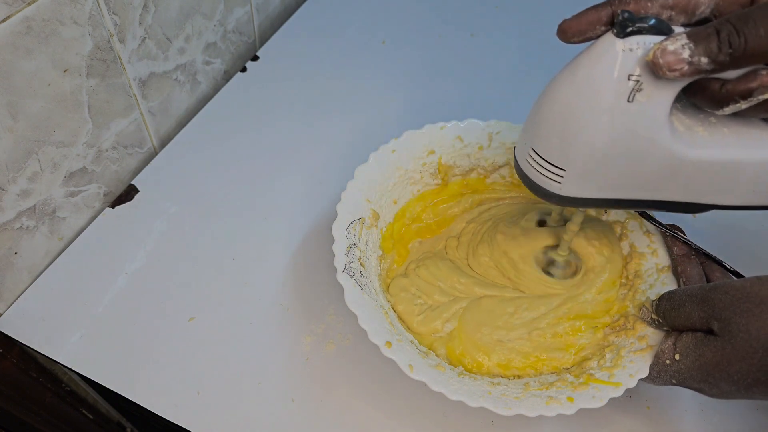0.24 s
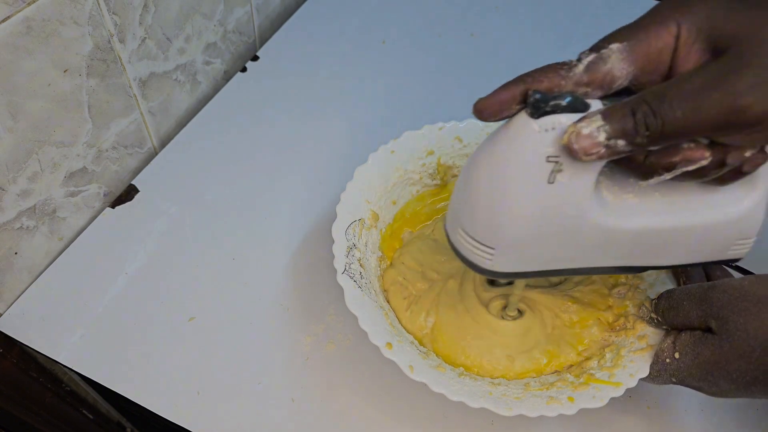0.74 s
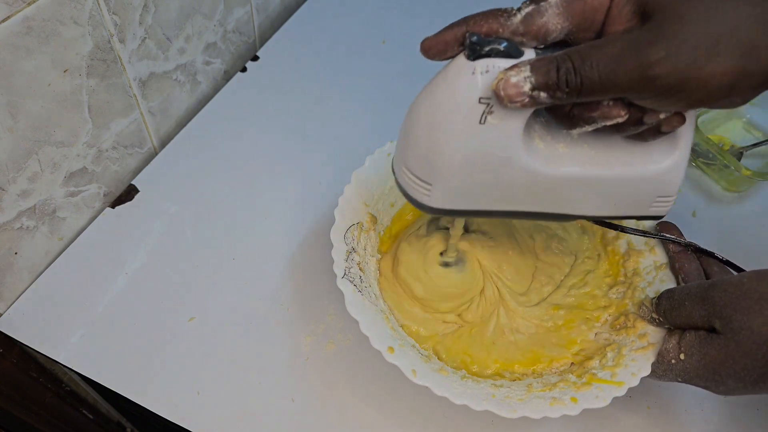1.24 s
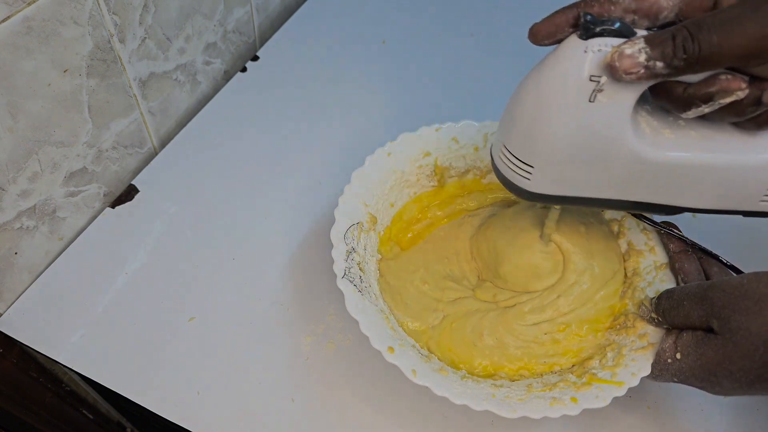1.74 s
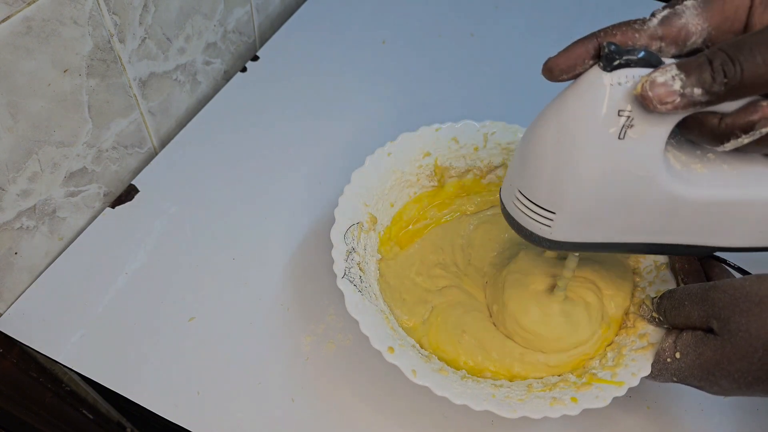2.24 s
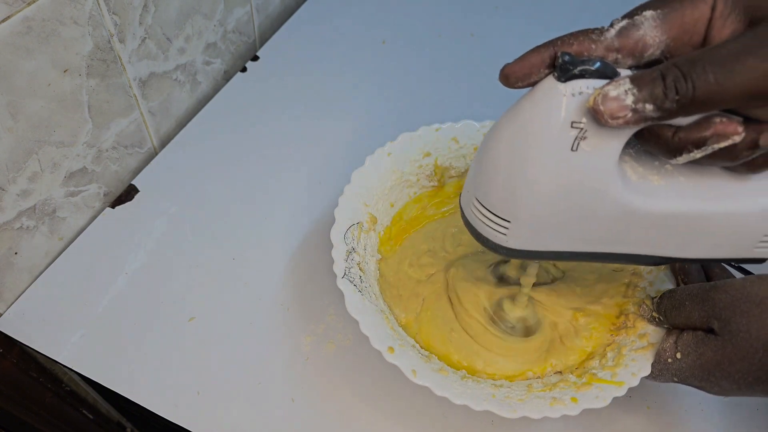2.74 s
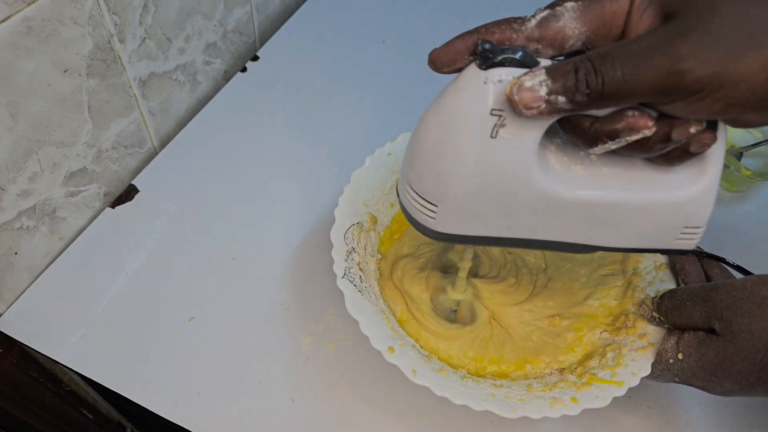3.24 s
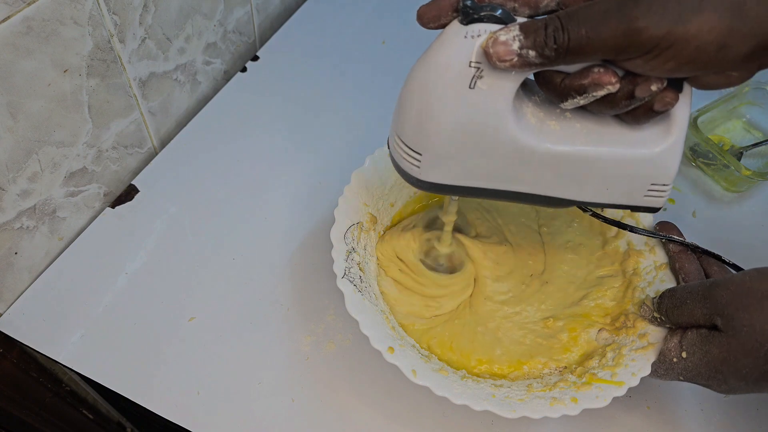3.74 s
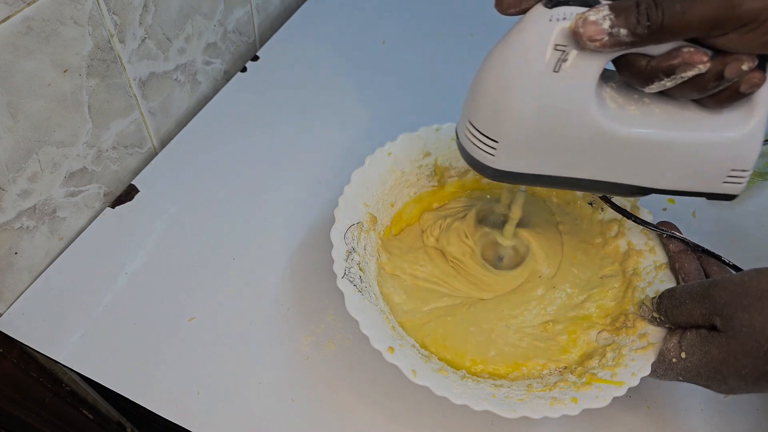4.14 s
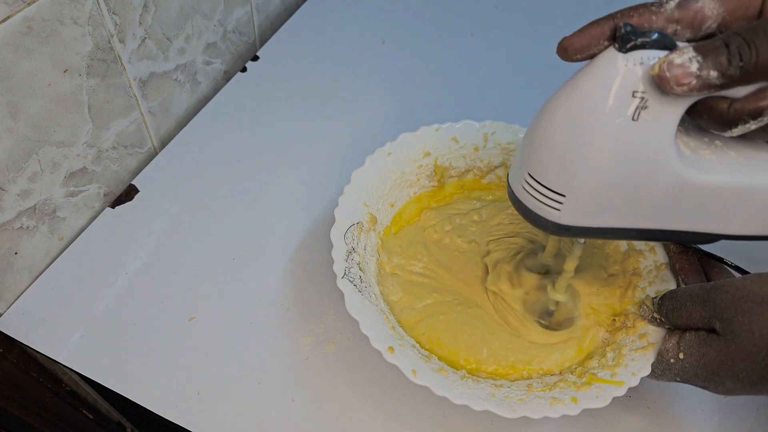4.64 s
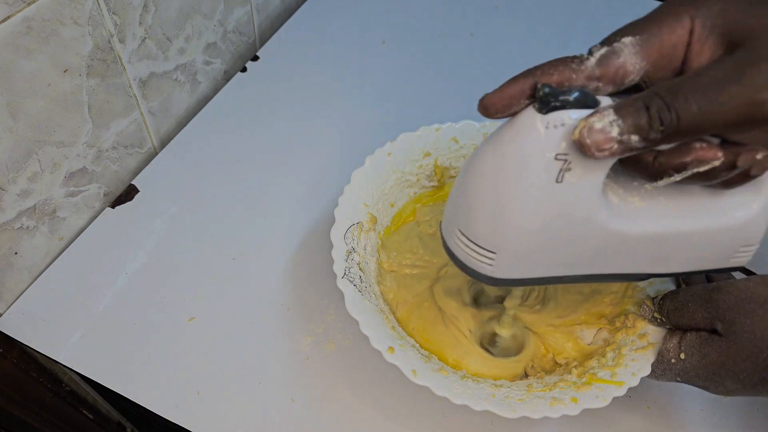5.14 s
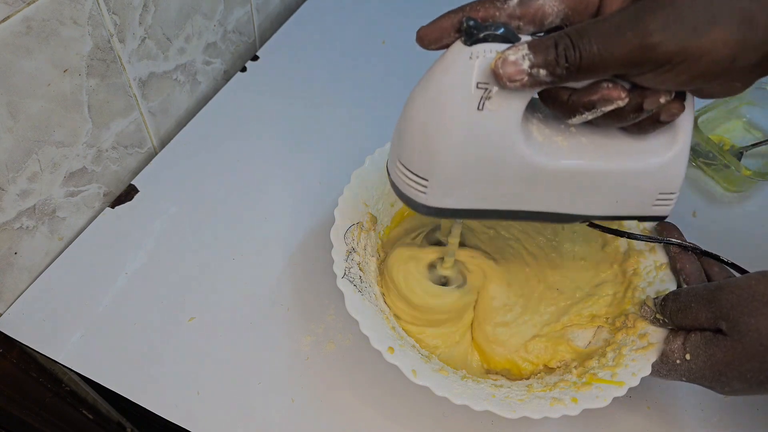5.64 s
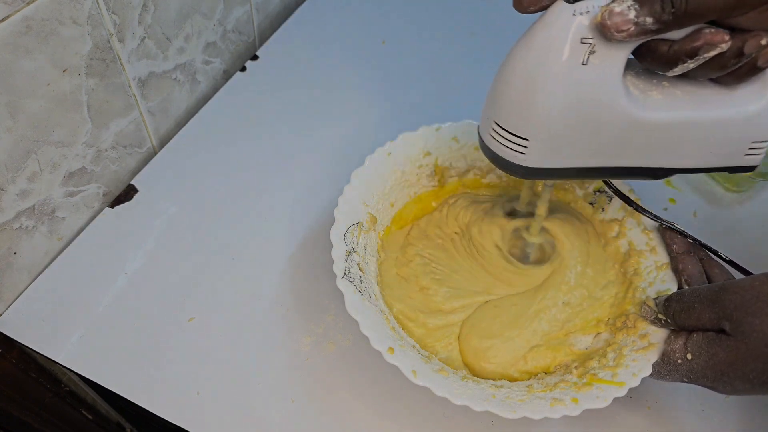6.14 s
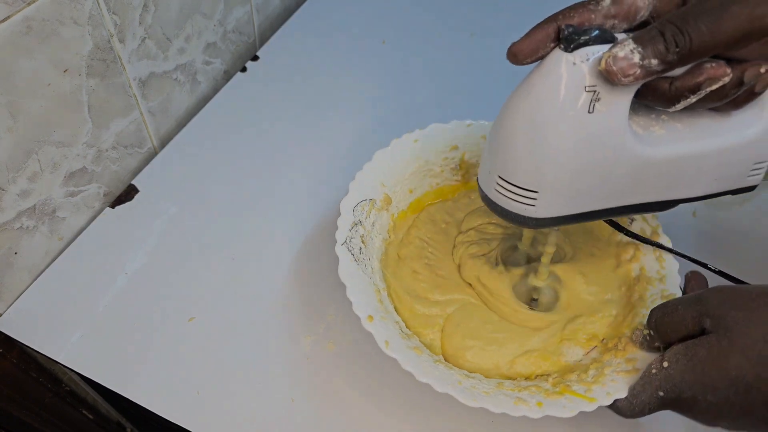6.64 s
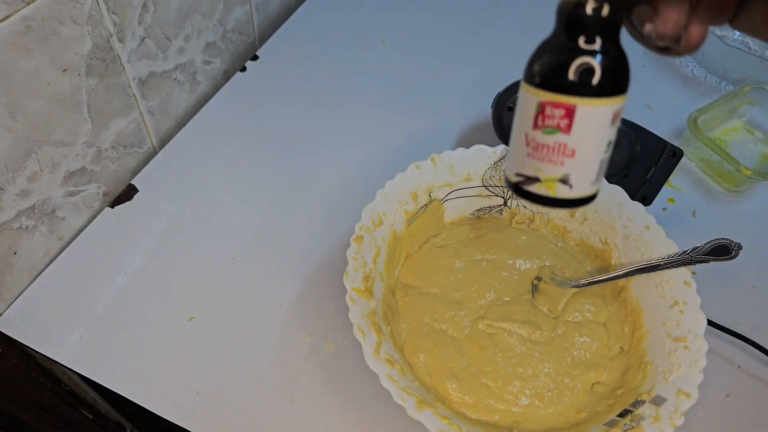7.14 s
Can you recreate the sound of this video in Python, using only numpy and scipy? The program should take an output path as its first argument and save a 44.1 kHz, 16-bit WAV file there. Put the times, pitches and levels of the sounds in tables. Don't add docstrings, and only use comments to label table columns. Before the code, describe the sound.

From the start an electric hand mixer is already running, close to a stereo microphone on a kitchen counter: a buzzy tonal whine near 270 Hz with singing overtones, wrapped in wide fan roar and brush hiss. A dull knock comes at about 0.65 s, then a rapid fading rattle of beaters on the batter-damped bowl from 0.8 to 0.95 s, with a growling scrape and last knocks until 1.15 s. The motor sags audibly to about 240 Hz around 1.75 s, recovers by 2.5 s and climbs to its highest whine near 3.3 s. It then holds slightly lower, wavering, overtones swelling and fading. From 5 to 5.6 s the tone throbs quickly; afterwards it runs on with a little more low electrical buzz. At 6.9 s it cuts off at once, leaving very quiet low room rumble and a faint appliance hum until about 7.4 s.

```python
import sys
import numpy as np
from scipy import signal
from scipy.io import wavfile
from scipy.ndimage import uniform_filter1d

SR = 44100
rng = np.random.default_rng(int(sys.argv[2]) if len(sys.argv) > 2 else 0)


def digitize_waveform(pressure):
    field = np.atleast_2d(pressure).T
    bounded = np.clip(field, -1, 1)
    quanta = np.round(bounded * 32767).astype(np.int16)
    wavfile.write(sys.argv[1], SR, quanta)


def invert_db(x):
    u = np.asarray(x, float) / 20
    return 10 ** u


N = 326207

# time in seconds, vents facing the microphone in dB,
# pressure on the bowl in dB.
HANDLING = [(0, -1, -4.5), (.48, 0.5, -2), (.84, 2.5, 6.5), (.92, -1.5, 6), (1.32, 1, -2),
            (1.71, -2.5, -4.5), (1.98, -2, -2), (2.8, 3.5, -0.5), (2.97, 4, 2.5), (3.59, 2, 2.5),
            (4.07, 1.5, -1.5), (4.95, 3.5, 1), (5.37, 0.5, 2.5), (6.02, 3, -2.5), (6.7, 1.5, 0),
            (6.89, 7.5, -1)]


def speed(t):
    # time in seconds, shaft speed in Hz.
    shaft = [(0.0, 273.8), (0.32, 272.2), (0.67, 283.3), (1.15, 287), (1.61, 244.4), (1.76, 238.6),
             (2.06, 264.8), (2.5, 288.7), (3.01, 323), (3.29, 328.3), (4.02, 309.4), (4.34, 313.7),
             (5.02, 316.4), (5.62, 298.9), (6.04, 307), (6.31, 300.6), (6.65, 311.5), (6.89, 305.7)]
    inertia_s = 0.12
    return uniform_filter1d(curves(shaft, t)[0], round(inertia_s * len(t) / t[-1]), mode="nearest")


def shaft_turns():
    t = np.arange(N) / SR
    flutter = 1 + 0.00072 * drift(25, t)
    return np.cumsum(speed(t) * flutter) / SR


def order_level(order, base_db, t):
    # resonance in Hz, half width in Hz, lift in dB.
    panels = [(635.6, 64.7, 48), (789, 41, 6.5), (1068, 56, 6.5), (1344, 91, 18), (1521, 85, 13.5),
              (1805, 58, 14.5), (2616, 77, 8.5), (3698, 47, 0.5), (7230, 152, 7.6), (7600, 456, 13.5),
              (10370, 67, -1), (11700, 120, 11.5), (14400, 600, 7)]
    # middle in seconds, half length in seconds,
    # order, lift in dB.
    grip = [(0, 0.18, 1, -12), (0.13, 0.049, 5, -6.5), (.14, 0.1, 3, 6), (.75, 0.23, 5, -7.5),
            (0.996, 0.022, 3, 13), (1.323, 0.099, 3, 6), (1.43, 0.13, 1, -8), (1.51, .5, 4, -9),
            (1.3, .1, 5, -5.5), (1.755, 0.23, 5, 21.5), (1.902, 0.034, 5, -9.5), (1.977, 0.15, 1, -10),
            (2.05, 0.097, 5, -1), (2.556, .12, 1, 5), (2.72, 0.082, 4, 9), (2.739, .16, 5, -17),
            (3.06, 0.11, 1, 3.5), (3.13, 0.036, 2, -2.5), (3.368, 0.046, 2, -9.5), (4.05, .1, 2, -2),
            (4.836, 0.28, 3, 8), (5.1, 0.16, 4, -4), (2.354, 0.13, 5, 3.5), (6.584, .08, 2, -3.5),
            (5.29, .17, 5, -14.5), (5.317, 0.22, 3, -18.5), (6.02, 0.49, 4, 6.5), (6.72, .08, 4, -4.5),
            (6.87, .17, 3, -14.5), (6.888, 0.17, 1, -4)]
    # middle in seconds,
    # half length in seconds, order, lift in dB.
    flares = [(0.456, .12, 8, -17), (1.358, .18, 8, 16), (1.62, 0.31, 7, 18), (1.681, 0.14, 9, 7.5),
              (1.68, .28, 14, 14), (1.723, .14, 12, 10.5), (2.394, 0.83, 8, -12.5), (2.465, 0.066, 9, 2.5),
              (3.322, .2, 7, -16), (2.901, .3, 36, -2.5), (1.4, 0.21, 24, 7.5), (3.371, 0.17, 22, 8),
              (3.678, .29, 23, 10), (3.71, .18, 9, 3), (3.769, .15, 46, 14), (3.9, .49, 7, 19),
              (3.941, 0.4, 47, 7), (4.08, .43, 12, 7.5), (4.313, 0.22, 6, 16.5), (4.427, 0.31, 24, -8.5),
              (4.46, 0.29, 9, 7), (4.539, .16, 47, 12), (4.55, 0.32, 36, 5), (5.037, .09, 24, 9.5),
              (5.033, .1, 6, 23), (5.5, 0.35, 6, -25.5), (5.72, 0.44, 13, 10.5), (6.179, 0.66, 14, 10.5),
              (6.85, 0.1, 9, -7.5), (6.868, .08, 7, 16)]
    db = base_db + sum(lift * bump(order * speed(t), f, w) for f, w, lift in panels)
    for middle, half, moved_order, lift in grip + flares:
        if round(moved_order) == order:
            db = db + lift * bump(t, middle, half)
    facing = curves(HANDLING, t)[0]
    fading_db = 1.4 * (order > 5) * drift(7, t)
    return db + 0.05 * facing + fading_db


def gear_levels(t):
    # shaft turns per cycle, level in dB.
    gears = [(5, -54), (4, -59)]
    (slow, slow_db), (fast, fast_db) = gears
    press_db = 0.46 * curves(HANDLING, t)[1]
    load_db = -22.5 * np.log2(speed(t) / 300)
    scrape_db = 12 * span(t, 0.77, 1)
    slow_level = slow_db + press_db + load_db + scrape_db - 6 * bump(t, 5.0, 0.4) + 4.2 * drift(12, t)
    top_speed_db = 6 * bump(speed(t), 338.4, 7.7)
    fast_level = fast_db + press_db + top_speed_db + 2 * drift(6.6, t)
    return {1 / round(slow): slow_level, 1 / round(fast): fast_level}


def orders(turns):
    # multiple of the shaft speed, level in dB.
    order_db = [(1, -40.8), (2, -75.5), (3, -45.5), (4, -48), (5, -52), (6, -58), (7, -63.5), (8, -50.5),
                (9, -44.5), (12, -52.5), (13, -60.5), (14, -62.5), (22, -64), (23, -67.5), (24, -57.5),
                (25, -66), (35, -66), (36, -58.9), (37, -57.5), (46, -68), (47, -68), (48, -62)]
    # frequency in Hz, side minus mid in dB.
    apart = [(60, -20), (120, -17), (300, -5), (630, -13), (1000, -2), (2000, 0)]
    beater_ratio = 17
    t, coarse = np.arange(N) / SR, np.linspace(0, N / SR, 2000)
    hz = speed(t)
    buzz_db = -61 + 9 * span(t, 5.45, N / SR, 0.2)
    out = np.zeros((2, N)) + invert_db(buzz_db) * np.sin(2 * np.pi * 120 * t)
    drag = 0.58 * span(t, 5.05, 5.6, 0.033)
    throb = 1 - drag + 2 * drag * np.cos(2 * np.pi * turns / beater_ratio)
    levels = {round(k): order_level(round(k), db, coarse) for k, db in order_db}
    levels = levels | gear_levels(coarse)
    for k, level_db in levels.items():
        db = np.interp(t, coarse, level_db)
        angle = 2 * np.pi * (k * turns + rng.random())
        mid_db = db + (1.32 + 0.04 * k) * drift(30, t)
        mid = invert_db(mid_db) * np.cos(angle) * (throb if k == 1 else 1)
        side_db = uniform_filter1d(db, 15000) + read(apart, k * hz) + 1.65 * drift(3, t)
        side_angle = angle + 2 * np.pi * rng.random() + 0.68 * drift(1.49, t)
        side = invert_db(side_db) * np.cos(side_angle)
        out += np.sqrt(2) * np.array([mid + side, mid - side])
    return out


def noise_levels(hz, t):
    # frequency in Hz, level in dB per Hz.
    air = [(53, -46), (90, -20), (254, -12.5), (308, -14.5), (351, -8), (475, -15.5), (616, -4), (1060, -8),
           (1930, -5.5), (2300, -11), (2510, -9.5), (14400, -23.5), (15700, -28)]
    # frequency in Hz, width in Hz, lift in dB.
    housing = [(84, 14, 12.5), (216, 21, 5.5), (651, 140, 9.5), (1875, 37, 10), (2057, 250, 7.5),
               (3220, 210, -2.5), (2600, 510, 4), (3666, 96, 9.5), (7520, 800, 2.5), (14840, 1200, 6)]
    colour_db = read(air, hz) + sum(db / (1 + (2 * (hz - f) / w) ** 2) for f, w, db in housing)
    facing, press = curves(HANDLING, t)
    hiss_db = 0.12 * facing + 10 * np.log2(speed(t) / speed(t).mean())
    swings = [1.2 * press, press, facing, hiss_db]
    centres = np.log([150, 700, 2000, 5000])
    swing_db = 0
    for k, swing in enumerate(swings):
        share = np.interp(np.log(hz + 1), centres, np.eye(4)[k])
        swing_db = swing_db + share[:, None] * swing
    vent_hz = 1936 - 38 * facing
    vent_db = bump(hz[:, None], vent_hz, 63)
    return colour_db[:, None] + swing_db + vent_db


def roar(turns):
    # frequency in Hz, left-right likeness from 0 to 1.
    likeness = [(60, 0.93), (170, 1), (300, 0.67), (680, 0.85), (1000, 0.24), (1600, 0.034), (2080, 0.16),
                (3000, 0.022)]
    hz, t = np.fft.rfftfreq(1024, 1 / SR), np.arange(N // 256 + 5) * 256 / SR
    field_db = noise_levels(hz, t)
    noise_db = field_db + 0.97 * patches(field_db.shape, 8, 16)
    noise = evened(hiss(noise_db, read(likeness, hz), size=1024))
    beat = 1 + 0.08 * np.cos(2 * np.pi * turns) + 0.14 * np.cos(4 * np.pi * turns)
    place, k = np.linspace(0, 1, 4097), np.arange(6, 51)[:, None]
    pattern = [np.cos(2 * np.pi * (k * place + rng.random(k.shape))).sum(0) for _ in range(2)]
    repeated = [np.interp(turns % 1, place, p) for p in pattern]
    z = signal.stft(repeated, nperseg=1024, noverlap=768)[2]
    bright_db = 1.6 * np.log2(hz[:, None] / 2000 + 0.5)
    fading_db = 5 * patches(z.shape, 6, 35)
    z = z * invert_db(field_db[:, :z.shape[2]] + bright_db + fading_db)
    brushes = evened(signal.istft(z, nperseg=1024, noverlap=768)[1][:, :N])
    return invert_db(-28) * noise * beat + invert_db(-37.5) * brushes


def strikes():
    # time in seconds, peak in dB, counter thump in relative dB.
    stray = [
        (.647, -23, -8),
        (.997, -28, -13),
        (1.079, -39, -25),
        (1.136, -21, -19),
    ]
    start_s, every_s, thump_db = 0.801, 0.0172, -14.5
    step = np.arange(9)
    db = -11 - 5.5 * (step / step[-1]) ** 3 - 2 * (step % 2)
    return stray + [(start_s + every_s * n, d, thump_db) for n, d in zip(step, db)]


def knocks():
    # frequency in Hz, level in dB, 60 dB decay time in seconds.
    bowl = [(110, 19, 0.044), (228, 4.5, 0.033), (380, -6, 0.15), (489, 9, 0.036), (586.5, -2, 0.012),
            (674, -6.5, .04), (1460, -42, 0.0095)]
    t, out = np.arange(6000) / SR, np.zeros(N + 6000)
    hz, mode_db, t60 = np.transpose(bowl)[:, :, None]
    low = hz < 150
    onset = 1 - np.exp(-t / 0.00041)
    for s, db, thump_db in strikes():
        a, b = rng.random((2, len(bowl), 1))
        level_db = mode_db - 60 * t / t60 + np.where(low, thump_db, 6 * a)
        mode_hz = hz * np.where(low, 1, 0.996 + 0.039 * b)
        ring = invert_db(level_db) * np.sin(2 * np.pi * mode_hz * t)
        out[round(s * SR):][:6000] += invert_db(db - 18) * ring.sum(0) * onset
    return out[:N] * np.array([[0.5], [-0.5]])


def kitchen():
    # frequency in Hz, level in dB per Hz.
    room = [(12, -60), (20, -27), (37, -26), (40, -27), (50, -8), (70, -6), (81, -4.5), (93, -23),
            (176, -34), (326, -44), (495, -40), (601, -44.5), (15700, -76)]
    # frequency in Hz, level in dB.
    hums = [(398.4, -86), (500.6, -79)]
    hz, frames, t = np.fft.rfftfreq(2048, 1 / SR), N // 512 + 5, np.arange(N) / SR
    same = np.interp(hz, [100, 300, 1000], [0.97, 0.5, 0.05])
    rumble = hiss(read(room, hz)[:, None] + np.zeros(frames), same, size=2048)
    hum = sum(invert_db(db) * np.sin(2 * np.pi * f * t) for f, db in hums)
    return invert_db(-55.5) * evened(rumble) + hum


def hiss(db_field, same, size):
    a, b, c, d = rng.standard_normal(db_field.T.shape + (4,)).T
    left, other = a + 1j * b, c + 1j * d
    same = np.clip(same, -1, 1)[:, None]
    right = same * left + np.sqrt(1 - same ** 2) * other
    z = np.array([left, right]) * invert_db(db_field)
    return signal.istft(z, nperseg=size, noverlap=size * 3 // 4)[1][:, :N]


def patches(shape, bins, frames):
    across_bins = uniform_filter1d(rng.standard_normal(shape), bins, -2)
    return evened(uniform_filter1d(across_bins, frames, -1))


def drift(top_hz, t):
    hz = np.geomspace(top_hz / 12, top_hz, 12)[:, None]
    coarse = np.linspace(0, t[-1], 1500)
    waves = np.sin(2 * np.pi * (hz * coarse + rng.random((12, 1)))) / np.sqrt(hz)
    return np.interp(t, coarse, evened(waves.sum(0)))


def evened(x):
    return x / np.sqrt(np.mean(x ** 2) + 1e-20)


def read(points, hz):
    f, value = np.transpose(points)
    return np.interp(np.log(hz + 1), np.log(f + 1), value)


def curves(rows, t):
    s, *columns = np.transpose(rows)
    return [np.interp(t, s, c) for c in columns]


def span(t, start, end, soft=0.06):
    return np.clip((t - start) / soft + 0.5, 0, 1) * np.clip((end - t) / soft + 0.5, 0, 1)


def bump(x, middle, half):
    return np.exp(-((x - middle) / half) ** 2)


def scene():
    change_s, fade_s = 6.889, 0.0012
    turns = shaft_turns()
    before = np.clip((change_s - np.arange(N) / SR) / fade_s, 0, 1)
    mixer = orders(turns) + roar(turns) + knocks()
    return before * mixer + (1 - before) * kitchen()


def low_pass(x):
    return signal.sosfilt(signal.butter(12, 15880, fs=SR, output="sos"), x)


def record(dry):
    bass_cut = signal.butter(2, 45, "highpass", fs=SR, output="sos")
    return low_pass(signal.sosfilt(bass_cut, dry))


dry = scene()
out = record(dry)
digitize_waveform(out)
```